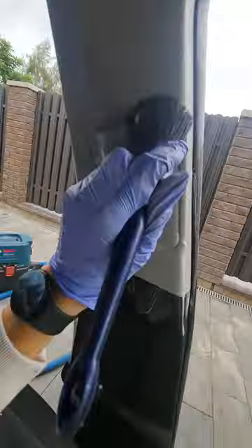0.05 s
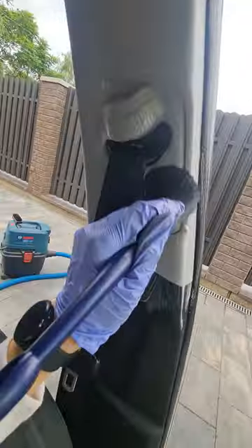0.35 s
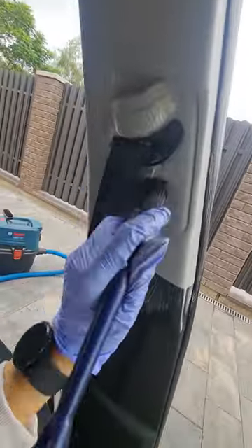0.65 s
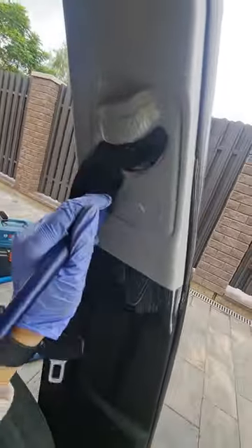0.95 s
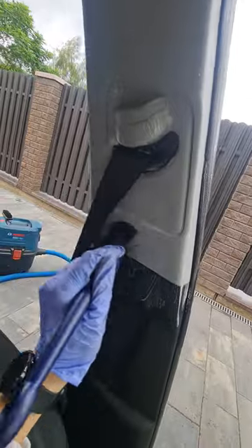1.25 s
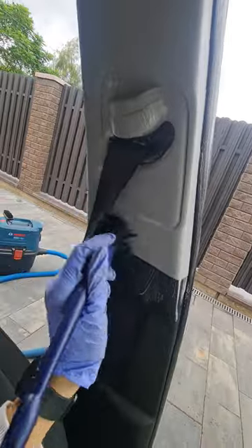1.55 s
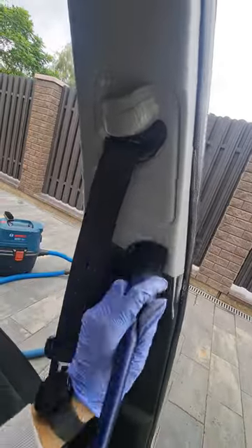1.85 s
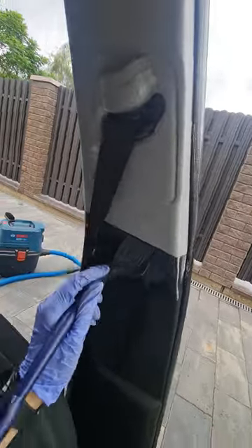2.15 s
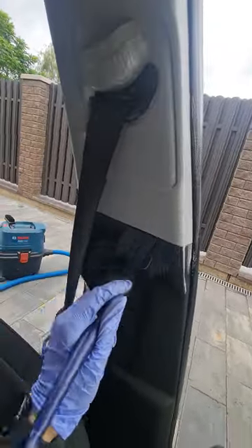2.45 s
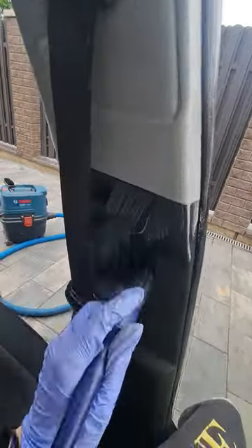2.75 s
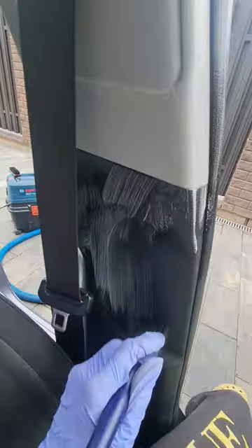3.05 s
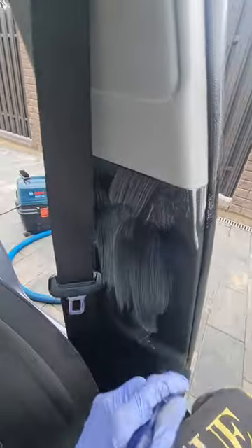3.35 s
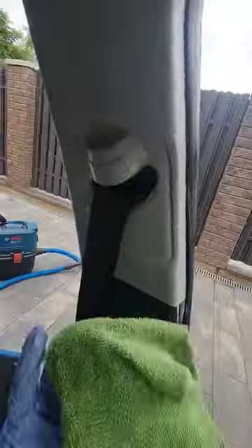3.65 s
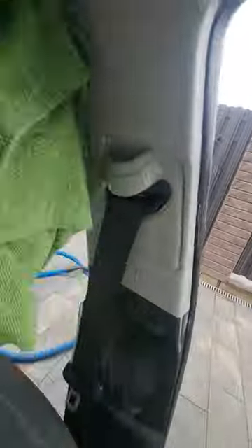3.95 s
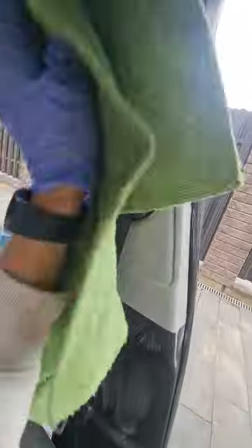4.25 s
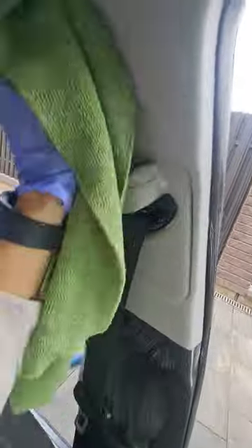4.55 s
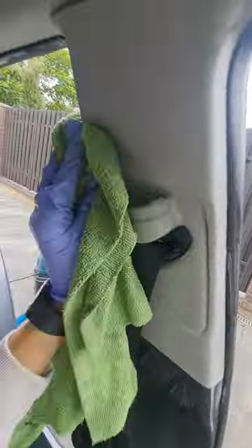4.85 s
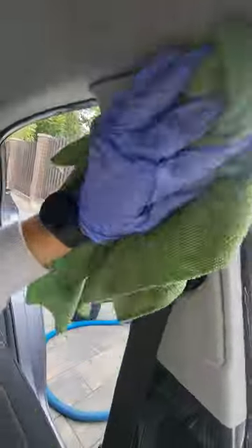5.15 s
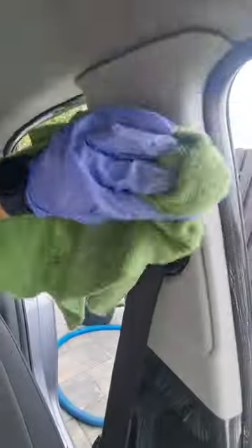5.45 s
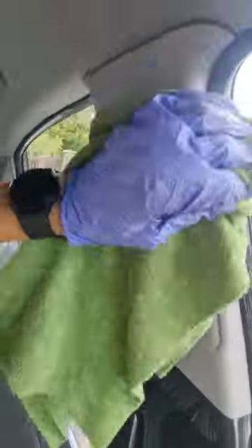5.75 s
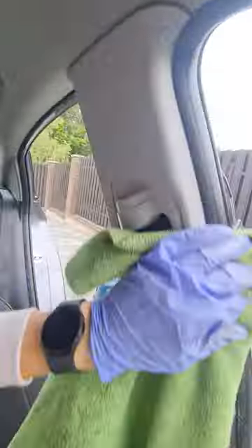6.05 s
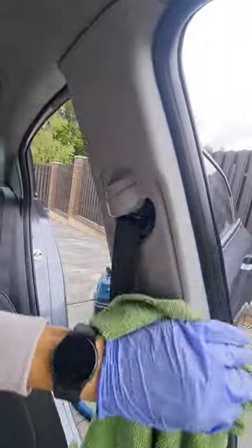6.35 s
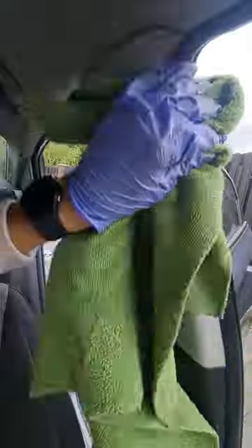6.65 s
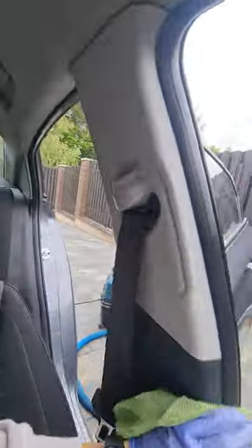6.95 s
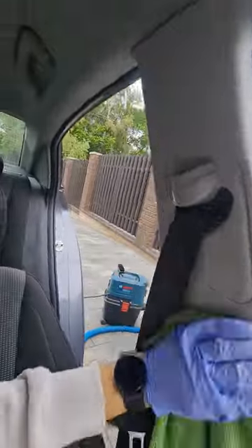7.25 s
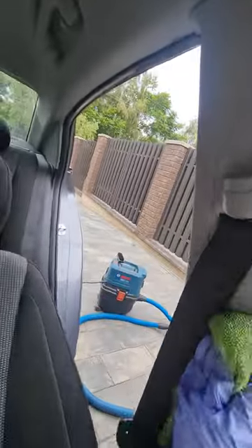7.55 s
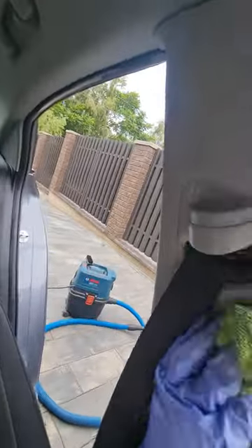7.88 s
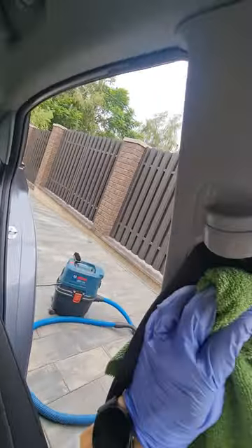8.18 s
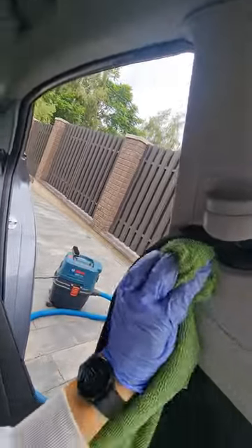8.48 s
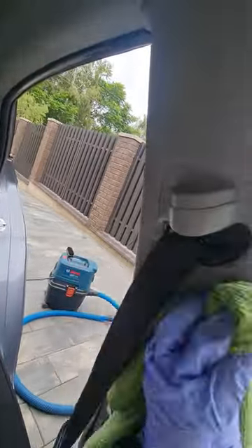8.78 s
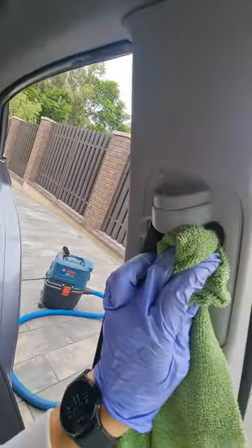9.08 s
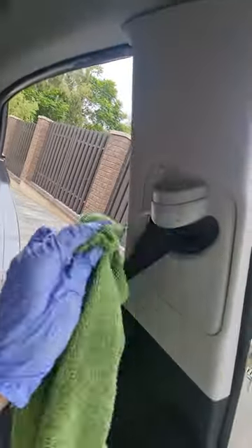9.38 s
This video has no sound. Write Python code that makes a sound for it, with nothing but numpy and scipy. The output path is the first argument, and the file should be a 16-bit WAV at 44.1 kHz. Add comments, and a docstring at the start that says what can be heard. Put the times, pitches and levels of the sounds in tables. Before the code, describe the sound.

A stiff brush scrubs and knocks on hollow plastic car trim, then a cloth wipes it softly, making the seat-belt loop clunk.

```python
"""In a car with its door open, a stiff brush scrubs the foamy plastic trim of the door pillar in quick
strokes and knocks on the hollow panel. Then a cloth wipes the pillar and nudges the seat-belt loop,
which clunks. Rubbing is thousands of tiny slips; a knock is a handful of tones that die away.
Two spaced microphones hear it from close by, with short cabin echoes and faint outdoor air."""
import sys
import numpy as np
from scipy import signal
from scipy.fft import rfft, irfft
from scipy.io import wavfile
from scipy.ndimage import map_coordinates

SR = 44100
rng = np.random.default_rng(int(sys.argv[2]) if len(sys.argv) > 2 else 0)


def log_audio(samples):
    """Write samples as a 16-bit WAV file to the path given in sys.argv[1]."""
    # one column per channel
    frames = np.atleast_2d(samples).T
    # limit to full scale, then quantise
    limited = np.clip(frames, -1, 1)
    pcm = np.round(limited * 32767).astype(np.int16)
    wavfile.write(sys.argv[1], SR, pcm)


N = 419832


def undb(db):
    """Turn decibels into a number to multiply by."""
    return 10 ** (np.asarray(db) / 20)


def unit(x):
    """Scale to an average strength (rms) of one."""
    return x / np.sqrt(np.mean(x ** 2))


def fade(t, t60):
    """Die away by 60 dB every t60 seconds."""
    return np.exp(-np.log(1000) * t / t60)


def curve(rows):
    """Join (time, value) points with straight lines."""
    times, values = np.transpose(rows)
    order = np.argsort(times, kind="stable")
    return np.interp(np.arange(N) / SR, times[order], values[order])


def convolve(x, response):
    """Pass a sound through one echo pattern, or one for each channel."""
    return signal.oaconvolve(np.atleast_2d(x), np.atleast_2d(response), axes=-1)[:, :N]


def filtered(x, order, hz, kind):
    """Keep the "low" part, the "high" part or a "band" of a sound."""
    return signal.sosfilt(signal.butter(order, hz, kind, fs=SR, output="sos"), x)


def colour(x, points, size=4096):
    """Turn lows and highs up or down along (frequency, level) points."""
    hz, db = np.transpose(points)
    grid = np.maximum(np.arange(size // 2 + 1) * SR / size, 1)
    gain = undb(np.interp(np.log(grid), np.log(hz), db))
    cepstrum = irfft(np.log(gain))
    # folding it keeps the filter from ringing before the sound arrives
    cepstrum[1:size // 2] *= 2
    cepstrum[size // 2 + 1:] = 0
    return convolve(x, irfft(np.exp(rfft(cepstrum))))


def wander(rate):
    """Drift to a new random value `rate` times a second."""
    steps = rng.standard_normal(4096)
    return unit(np.interp(np.arange(N) / SR * rate, np.arange(len(steps)), steps))


def delay(x, s):
    """The same sound, s seconds later."""
    i = np.arange(len(x))
    return np.interp(i - s * SR, i, x, left=0)


def pair(x, lag_ms):
    """Sound reaches the right microphone a little later."""
    return np.array([x, delay(x, lag_ms / 1000)])


def add(track, s, sound):
    """Mix a stereo sound into a track at s seconds."""
    start = max(int(s * SR), 0)
    track[:, start:start + sound.shape[1]] += sound[:, :max(N - start, 0)]


def cabin(x, lag_ms, echo_db, t60):
    """Glass and trim add a short echo that differs at each microphone."""
    t = np.arange(len(x)) / SR
    echoes = rng.standard_normal((2, len(t))) * fade(t, t60) * (t > .001)
    echoes /= np.sqrt(np.sum(echoes ** 2, axis=1, keepdims=True))
    return pair(x, lag_ms) + undb(echo_db) * convolve(x, echoes)[:, :len(x)]


def slips(per_s, spread):
    """Tiny slips at random moments, most faint and a few strong."""
    moment, strength, sign = rng.random((3, 200000))[:, :int(per_s * N / SR)]
    sizes = undb(spread * np.minimum(-np.log(1 - strength), 5))
    return unit(np.bincount((moment * N).astype(int), sizes * np.sign(sign - .5), minlength=N))


def shifting(x, depth_db, rate=14, size=512, bands=26):
    """The tone drifts as the rubbing moves to new spots."""
    hz, t, frames = signal.stft(x, SR, nperseg=size)
    place = np.meshgrid(bands * np.sqrt(hz / hz[-1]), t * rate, indexing="ij")
    drift = map_coordinates(rng.standard_normal((bands + 1, size)), place, order=1, mode="mirror")
    return signal.istft(frames * undb(depth_db * drift), SR, nperseg=size)[1][:, :N]


def friction(tone, per_s, spread, lag_ms, scatter_db, shift_db, bounce=0):
    """Rubbing: a stream of slips, heard directly and scattered differently to each microphone."""
    direct = pair(slips(per_s, spread), lag_ms)
    scattered = np.array([slips(per_s, spread), slips(per_s, spread)])
    rub = direct + undb(scatter_db) * scattered
    if bounce:  # the moving hand throws some sound back
        rub = rub + bounce * np.array([delay(side, .0032 + 0.000487 * wander(3)) for side in rub])
    return unit(colour(shifting(rub, shift_db), tone))


def strokes(rows, roundness):
    """Three layers swell and fade with the hand's speed; rise and fall each cover 20 dB."""
    power = np.zeros((3, N))
    for s, rise, fall, db, relative_db, drag_db in rows:
        i = np.arange(max(int((s - 2 * rise) * SR), 0), min(int((s + 2 * fall) * SR), N))
        from_peak = np.maximum((s - i / SR) / rise, (i / SR - s) / fall)
        swell = undb(-20 * from_peak ** roundness)
        power[:, i] += np.outer(undb([db, db + relative_db, drag_db]), swell) ** 2
    return np.sqrt(power)


# Tone of the air outside: f/Hz, level/dB (table levels are relative; functions set the overall level)
AIR_TONE = [(20, -8.5), (32, -5), (50, 8), (110, -8.5), (250, -18.5), (500, -16.5), (900, -23.5),
            (1800, -23.5), (3500, -28.5), (6500, -30), (9000, -35.5), (16000, -33)]
def outdoor_air():
    """Faint air comes through the open door, swelling slowly."""
    air = rng.standard_normal(N) + undb(8) * rng.standard_normal((2, N))
    return undb(-58 + 0.87 * wander(1.4)) * unit(colour(air, AIR_TONE))


# How strongly the arm rumbles: t/s, level/dB
ARM_LEVEL = [(0.0, -42.5), (0.42, -62), (0.64, -44), (1.83, -52), (2.2, -46), (3.21, -51.5), (3.61, -60.5),
             (5.54, -53), (5.73, -57.5), (6.65, -64.5), (6.84, -46), (7.48, -54.5), (9.04, -50),
             (9.52, -51)]
# Tone of that rumble: f/Hz, level/dB
ARM_TONE = [(20, -31), (35, -10), (50, 7), (75, 6), (110, -4), (170, -2.5), (260, -10.5), (400, -17.5),
            (900, -46.5)]
def arm_rumble():
    """The working arm makes a soft, low rumble."""
    rumble = friction(ARM_TONE, per_s=1800, spread=2.4, lag_ms=0.76, scatter_db=-10, shift_db=3)
    return undb(curve(ARM_LEVEL) - 1.5) * rumble


def hollow_edge(x, hz=3020, width_hz=550, db=3, fade_db_per_s=7):
    """The first strokes, by the belt guide, sound hollow; this fades as the brush moves down."""
    band = filtered(x, 1, [hz - width_hz / 2, hz + width_hz / 2], "band")
    return x + band * undb(db - fade_db_per_s * np.arange(N) / SR)


BRUSH_ROUNDNESS, CLOTH_ROUNDNESS = 1.78, 2.06  # stroke shape: 1 is pointed, 2 is a bell
# Brush strokes: t/s at top speed, rise/s, fall/s, level/dB, scrape/dB added to level, drag/dB
BRUSH_STROKES = [(.10, 0.19, 0.16, -45.5, -0.5, -44), (.272, 0.047, 0.041, -45, -4, -60),
                 (.36, 0.053, .10, -40.5, -3, -35.5), (.495, 0.068, 0.066, -38, -2, -29.5),
                 (.615, 0.056, .09, -43.5, -5, -43.5), (.695, 0.059, 0.065, -40, -0.5, -39.5),
                 (.84, 0.065, 0.069, -52, -2.5, -40), (.93, 0.068, 0.095, -39.5, -4.5, -34.5),
                 (1.14, 0.097, .09, -44, -4.5, -44), (1.275, 0.083, 0.058, -33, -4, -38),
                 (1.39, 0.062, .07, -39.5, -3.5, -40.5), (1.495, 0.049, 0.059, -31.5, 5.5, -28.5),
                 (1.60, 0.063, 0.067, -39, -2.5, -46), (1.71, .07, 0.054, -44.5, -2, -52),
                 (1.80, .02, 0.045, -43.5, -3, -36.5), (1.885, 0.086, 0.21, -44.5, 1.5, -48),
                 (2.07, 0.064, 0.072, -58, -2.5, -45), (2.175, 0.043, 0.083, -42, 4, -37),
                 (2.325, .11, 0.034, -51.5, 0.5, -55), (2.50, .06, 0.13, -40, -1.5, -44.5),
                 (2.575, 0.073, 0.053, -35, -9.5, -52), (2.725, 0.099, 0.039, -40, -4.5, -56),
                 (2.85, .03, 0.12, -45.5, 2.5, -40), (2.945, 0.097, 0.09, -38.5, 0.5, -54),
                 (3.105, 0.068, 0.043, -39, -7, -58), (3.275, 0.061, 0.074, -36.5, -0.5, -63),
                 (3.345, 0.054, 0.035, -39.5, -1, -54.5)]
# Tone of the bristle tips: f/Hz, level/dB
BRISTLE_TONE = [(700, -33), (1500, -12.5), (2300, -3.5), (3100, -2), (3900, -4.5), (5000, -1.5),
                (6300, -1.5), (8000, -1.5), (16000, 1.5)]
# Tone of the scraping tuft: f/Hz, level/dB
SCRAPE_TONE = [(300, -8.5), (600, -1.5), (950, -5), (1400, 0.5), (2000, -2.5), (2800, -11.5), (5000, -24.5)]
def brush():
    """Bristle tips flick over the grainy plastic; the pressed tuft catches with a deeper scrape."""
    tip_gain, tuft_gain, _ = strokes(BRUSH_STROKES, BRUSH_ROUNDNESS)
    catching = undb(1.1 * wander(70))
    tips = friction(BRISTLE_TONE, per_s=4500, spread=2.4, lag_ms=0.32,
                    scatter_db=13, shift_db=-1, bounce=0.64)
    tuft = friction(SCRAPE_TONE, per_s=3000, spread=2.45, lag_ms=0.38,
                    scatter_db=2, shift_db=6, bounce=0.85)
    return catching * (undb(4) * tip_gain * hollow_edge(tips) + undb(-0.1) * tuft_gain * tuft)


# Tone of the rubbed panel: f/Hz, level/dB
PANEL_TONE = [(150, -6.5), (270, -13.5), (350, -8), (430, 5), (560, -9), (700, -2.5), (900, -17),
              (1600, -35)]
def panel_drag():
    """The brush sticks and slips, shaking the hollow panel."""
    *_, drag = strokes(BRUSH_STROKES, BRUSH_ROUNDNESS)
    panel = friction(PANEL_TONE, per_s=910, spread=2.86, lag_ms=0.62, scatter_db=-6.5, shift_db=4.5)
    return undb(-5) * drag * panel


def ring(tones, t):
    """A struck part rings; each spot that is hit gives slightly different levels and pitches."""
    chance = rng.standard_normal((len(tones), 2)) * [1.2, .012]
    y = sum(undb(db + louder_db) * np.sin(2 * np.pi * hz * (1 + bend) * t) * fade(t, t60)
            for (hz, db, t60), (louder_db, bend) in zip(tones, chance))
    return y / np.abs(y).max()


def thud(tones, brightness_hz, t, lowest_hz):
    """A soft hit pushes for longer and wakes only the low tones; slow bending makes no sound."""
    push = t * np.exp(-2 * np.pi * brightness_hz * t)
    y = signal.fftconvolve(ring(tones, t), push)[:len(t)]
    y = filtered(y, 1, lowest_hz, "high")
    return y / np.abs(y).max()


# Ringing tones of stiff plastic: f/Hz, level/dB, time to fade by 60 dB/s
PLASTIC_RING = [(1395, -2.5, 0.02), (1602, 5.5, 0.01), (1780, -0.5, 0.012), (2150, -24, 0.044),
                (2164, -10, 0.021), (2470, -4, 0.011), (2920, -5.5, 0.0073), (3450, -11, 0.0078)]
def tick(t, crack_db, crack_t60):
    """Hard plastic meets hard plastic: a brief ring and a crack."""
    return ring(PLASTIC_RING, t) + undb(crack_db) * rng.standard_normal(len(t)) * fade(t, crack_t60)


# Ringing tones of the hollow panel: f/Hz, level/dB, time to fade by 60 dB/s
PANEL_RING = [(161, -21, 0.29), (220, -4.5, .07), (250.4, -1, 0.072), (322, -17, 0.032), (396, -5, 0.06),
              (435.6, 8.5, 0.041), (489, 9, 0.026), (673, 0, 0.044), (830, 0.5, 0.025), (1002, -31, 0.034),
              (1365, -22, 0.049)]
# Hits on the panel: t/s, level/dB, brightness/Hz, tick/dB added to level
PANEL_HITS = [(0.111, -27.5, 110, -45), (.339, -35, 200, -45), (.487, -14, 800, -20),
              (0.706, -5, 504, -16.5), (0.776, -20.5, 120, -37), (0.927, -19, 604, -17),
              (1.069, -30.5, 398, -40), (1.269, -18, 400, -45), (1.429, -4, 600, -10.5),
              (1.788, -31.5, 694, -26), (2.165, 0.5, 800, -8), (2.2044, 0, 705, -11.5),
              (2.433, -15.5, 610, -17.5), (2.505, -21, 199, -35), (2.823, -20.5, 398, -13.5),
              (2.925, -5.5, 555, -7.5), (3.182, -20.5, 170, -9.5), (3.261, -28, 160, -37),
              (3.85, -39.5, 488, -29), (4.62, -47.5, 500, -30), (5.587, -39, 116, -40)]
def knocks(echo_s=0.007246, echo_db=4.5, flex_s=.0018, boom_db=-19, boom_s=0.031):
    """Brush head or hand thumps the panel; the cabin throws the thump back and booms briefly."""
    track, t = np.zeros((2, N)), np.arange(SR // 4) / SR
    for s, db, brightness_hz, tick_db in PANEL_HITS:
        thump = delay(thud(PANEL_RING, brightness_hz, t, lowest_hz=148), flex_s)
        boom = unit(filtered(rng.standard_normal(len(t)), 3, [135, 300], "band")) * np.exp(-t / boom_s)
        thump = thump + delay(undb(echo_db) * thump + undb(boom_db) * boom, echo_s)
        add(track, s, undb(db - 7) * cabin(thump, lag_ms=0.59, echo_db=-13, t60=0.15))
        click = tick(t, crack_db=-19, crack_t60=0.013)
        add(track, s, undb(db + tick_db + 2) * cabin(click, lag_ms=.4, echo_db=-0.5, t60=0.044))
    return track


def bristle_slaps(level_db=-47, fade_s=0.017):
    """When the brush hits, its bristles slap down and spread with a short hiss."""
    track, t = np.zeros((2, N)), np.arange(SR // 8) / SR
    for s, *_ in PANEL_HITS:
        if s < BRUSH_STROKES[-1][0]:
            add(track, s, np.exp(-t / fade_s) * rng.standard_normal((2, len(t))))
    return undb(level_db) * colour(track, BRISTLE_TONE)


def after_hits(hits, base_db, share, rise_s, fall_s):
    """Shaking builds and dies after each hit, growing with a share of the hit's level."""
    gain, t = np.zeros(N + SR), np.arange(SR) / SR
    swell = (1 - np.exp(-t / rise_s)) * np.exp(-t / fall_s)
    for s, db, *_ in hits:
        after = slice(int(s * SR), int(s * SR) + SR)
        gain[after] = np.maximum(gain[after], undb(base_db + share * db) * swell)
    return gain[:N]


# Tone of the shaking pillar: f/Hz, level/dB
SHUDDER_TONE = [(30, -13.5), (60, -1.5), (100, -1), (160, 2), (250, -2), (400, -14), (900, -43.5)]
def pillar_shudder():
    """The pillar gives a low shudder after each knock and clunk."""
    knocked = after_hits(PANEL_HITS, base_db=-31.5, share=0.44, rise_s=0.0064, fall_s=0.071)
    clunked = after_hits(LOOP_HITS, base_db=-34, share=0.34, rise_s=0.013, fall_s=0.048)
    noise = pair(rng.standard_normal(N), lag_ms=.6)
    return (knocked + clunked) * unit(colour(noise, SHUDDER_TONE))


# Snaps of glove and belt: t/s, level/dB, crack/dB compared with the ring
SMALL_SNAPS = [(2.14, -39, -10), (3.457, -47.5, 5.5), (3.764, -55, 1), (4.9, -42, -7), (5.648, -32, -2),
               (5.661, -42, 3), (6.614, -51, 6), (7.137, -35, -19), (7.233, -30, -13)]
def snaps():
    """Glove and belt give short, thin snaps."""
    track, t = np.zeros((2, N)), np.arange(SR // 10) / SR
    for s, db, crack_db in SMALL_SNAPS:
        snap = tick(t, crack_db, crack_t60=0.027)
        add(track, s, undb(db) * cabin(snap, lag_ms=.3, echo_db=0, t60=0.06))
    return track


# Cloth strokes: t/s at top speed, rise/s, fall/s, level/dB, hiss/dB added to level, drag/dB
CLOTH_STROKES = [(3.47, 0.035, 0.54, -63.5, -4.5, -72), (4.355, 0.1, 0.12, -49, -7.5, -52),
                 (4.56, 0.11, 0.12, -55, -7, -58), (4.775, .1, 0.083, -50.5, -6.5, -43),
                 (4.98, 0.18, 0.16, -55.5, -8.5, -61), (5.19, 0.088, .08, -45.5, 0.5, -41),
                 (5.265, 0.093, 0.042, -44, 3.5, -42.5), (5.42, 0.36, 0.67, -57, -5.5, -56),
                 (5.70, 0.14, .12, -53, -5.5, -55), (5.89, 0.076, 0.14, -70.5, 13.5, -64),
                 (6.07, 0.13, 0.24, -47, -11.5, -45.5), (6.48, .16, 0.18, -46.5, -15.5, -53),
                 (6.80, 0.13, 0.16, -44, -9.5, -51), (6.93, 0.12, 0.16, -45, -18, -38),
                 (7.26, .13, .15, -44, -12, -37.5), (7.53, 0.11, 0.076, -42.5, -16, -38),
                 (7.68, 0.095, 0.08, -44.5, -10, -41.5), (7.76, 0.098, 0.11, -67, -9, -39),
                 (7.94, 0.27, 0.16, -53.5, -11.5, -45), (8.17, 0.065, 0.098, -60.5, -4, -46),
                 (8.27, 0.2, .12, -51.5, -11, -38), (8.52, 0.31, 0.3, -62, -16, -52),
                 (8.70, 0.15, 0.057, -55.5, -2.5, -52), (8.79, 0.09, 0.056, -45.5, -19, -30),
                 (8.95, 0.14, 0.058, -58, -10, -48.5), (9.09, 0.11, 0.19, -53, -11, -41.5),
                 (9.36, 0.12, 0.085, -54, -3, -48)]
# Tone of the pressed cloth: f/Hz, level/dB
RUB_TONE = [(300, -11.5), (600, 6.5), (950, -2), (1500, 2.5), (2300, -4), (3200, -1.5), (4400, -13),
            (8000, -34.5)]
# Tone of its hissing fibres: f/Hz, level/dB
FIBRE_TONE = [(1500, -27), (3200, -2), (4200, -1.5), (5200, 3.5), (6300, 2.5), (8000, -1.5), (16000, 2.5)]
def cloth():
    """Soft fibres rub with a fine hiss that flutters as the folds shift."""
    rub_gain, hiss_gain, _ = strokes(CLOTH_STROKES, CLOTH_ROUNDNESS)
    rub = friction(RUB_TONE, per_s=3000, spread=2.2, lag_ms=0.41,
                   scatter_db=1, shift_db=3.5, bounce=0.72)
    hiss = friction(FIBRE_TONE, per_s=10000, spread=3.5, lag_ms=0.29,
                    scatter_db=8.5, shift_db=1, bounce=0.51)
    flutter = undb(2.66 * wander(45))
    return flutter * (undb(-2.25) * rub_gain * rub + undb(3) * hiss_gain * hiss)


# Tone of the pillar's upper cover: f/Hz, level/dB
COVER_TONE = [(150, -8), (270, -12.5), (350, -7), (440, 3.5), (550, -2), (700, -2.5), (900, -13),
              (1600, -33)]
def cover_drag():
    """The cloth sticks and slips, shaking the cover above the panel."""
    *_, drag = strokes(CLOTH_STROKES, CLOTH_ROUNDNESS)
    cover = friction(COVER_TONE, per_s=1400, spread=2.36, lag_ms=0.59, scatter_db=-6, shift_db=3.5)
    return undb(-5.5) * drag * cover


# Swishes of the ribbed weave: t/s at top speed, length/s, level/dB, f/Hz at top speed
WEAVE_SWISHES = [(4.365, 0.14, -58, 1720), (4.342, 0.2, -58.5, 976), (4.78, .22, -52.5, 1501),
                 (5.004, 0.13, -61, 1183), (5.192, .13, -48.5, 401), (5.889, 0.12, -54, 4170),
                 (6.098, 0.28, -60, 1490), (8.28, .12, -42.5, 626), (7.26, 0.18, -53.5, 1403),
                 (7.533, 0.13, -53, 2110), (7.668, .14, -53.5, 3510), (8.795, 0.055, -39, 1403)]
def swishes(blur_width=0.31, slowest=0.42):
    """The weave ticks over an edge, so its blurry pitch rises and falls with the hand's speed."""
    track = np.zeros((2, N))
    for s, length, db, hz in WEAVE_SWISHES:
        speed = np.sin(np.linspace(0, np.pi, int(length * SR)))
        pitch_hz = hz * (slowest + (1 - slowest) * speed)
        phase = 2 * np.pi * np.cumsum(pitch_hz) / SR
        blur = filtered(rng.standard_normal((2, SR)), 2, blur_width * hz / 2, "low")[:, :len(speed)]
        weave = unit(blur[0] * np.cos(phase) + blur[1] * np.sin(phase))
        swish = undb(db) * speed ** 2 * weave
        add(track, s - length / 2, cabin(swish, lag_ms=0.41, echo_db=0.5, t60=0.015))
    return track


# Puffs of air: t/s at the middle, length/s, level/dB, f/Hz at the top edge, left minus right/dB
AIR_PUFFS = [(5.006, 0.12, -51, 108, -4), (5.265, .16, -44, 174, 4.5), (5.902, 0.13, -53, 106, -13),
             (6.647, 0.18, -45, 96, 0), (6.969, .3, -46.5, 250, -18), (9.39, 0.14, -52.5, 138, 0)]
def puffs():
    """The loose end of the cloth fans air across the microphones."""
    track = np.zeros((2, N))
    for s, length, db, top_hz, side_db in AIR_PUFFS:
        swell = np.hanning(int(length * SR))
        swirl = filtered(rng.standard_normal(len(swell)), 2, [top_hz / 2, top_hz], "band")
        gains = undb(db + np.array([[side_db], [-side_db]]) / 2)
        add(track, s - length / 2, gains * swell * unit(swirl))
    return track


# Ringing tones of the belt loop: f/Hz, level/dB, time to fade by 60 dB/s
LOOP_RING = [(201, -5, 0.19), (452, -29, 0.12), (457, 0, 0.049), (546.6, 6.5, 0.056), (627, 9, 0.058),
             (740, -8, .05), (1020, -2.5, 0.012), (1167, -3, 0.024), (1325, -0.5, 0.013),
             (1790, -19, 0.018)]
# Clunks of the loop: t/s, level/dB, brightness/Hz, tick/dB added to level
LOOP_HITS = [(6.935, -24.5, 600, -23), (7.186, -29.5, 700, -25), (7.345, -24, 700, -14),
             (7.785, -26.5, 900, -7), (7.881, -8.5, 1500, -22), (7.988, -30, 700, -23),
             (8.010, -20.5, 900, -10), (8.126, -39, 700, -28), (8.152, -23.5, 804, -25),
             (8.689, -23.5, 700, -1.5), (8.774, -20.5, 590, -23), (8.797, -28, 900, 2),
             (8.955, -15.5, 575, -21.5), (9.021, -20.5, 696, -5.5), (9.083, -20, 700, -9.5),
             (9.0877, -9.5, 500, -16.5), (9.094, -12.5, 250, -34)]
def belt_loop():
    """The cloth pushes the belt loop against its stop, and it clunks."""
    track, t = np.zeros((2, N)), np.arange(SR // 4) / SR
    for s, db, brightness_hz, tick_db in LOOP_HITS:
        clunk = thud(LOOP_RING, brightness_hz, t, lowest_hz=338)
        add(track, s, undb(db - 3.5) * cabin(clunk, lag_ms=0.57, echo_db=-1.5, t60=0.069))
        click = tick(t, crack_db=-11.5, crack_t60=0.0047)
        add(track, s, undb(db + tick_db + 1.5) * cabin(click, lag_ms=0.33, echo_db=-4, t60=0.021))
    return track


# Where the hand works: t/s, left minus right/dB
HAND_SIDE = [(0.0, 3.0), (2.52, 1.0), (2.86, 3.5), (3.66, -3), (4.74, 7), (4.8, 3), (5.83, 4), (6.28, -2.0),
             (6.63, 4), (6.92, -1.5), (8.03, 1.5), (9.52, 0.5)]
def scene():
    """The rubbing follows the hand from side to side; hits, rumble and air join it."""
    side_db = curve(HAND_SIDE)
    rubbing = brush() + bristle_slaps() + cloth() + swishes() + panel_drag() + cover_drag()
    rubbing *= undb(np.array([side_db, -side_db]) / 2)
    hits = knocks() + belt_loop() + snaps()
    return rubbing + hits + arm_rumble() + pillar_shudder() + puffs() + outdoor_air()


# How well the microphones hear each pitch: f/Hz, level/dB
MICROPHONE_TONE = [(20, -18), (42, 0.5), (6800, 1), (7300, -8), (7900, -13.5), (9300, -22.5),
                   (11500, -15.5), (16000, -19.5)]
def record(dry):
    """The microphones dull the high treble, and the very top is cut off."""
    top_cut = signal.ellip(10, .2, 70, 15850, fs=SR, output="sos")
    return signal.sosfilt(top_cut, colour(dry, MICROPHONE_TONE))


dry = scene()
out = record(dry)
log_audio(out)
```